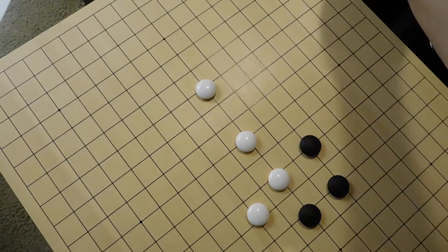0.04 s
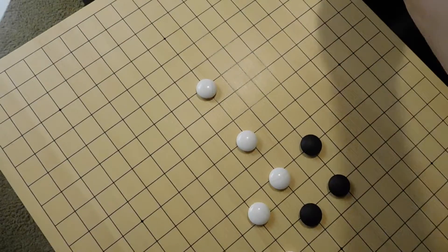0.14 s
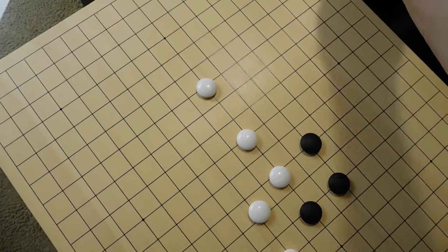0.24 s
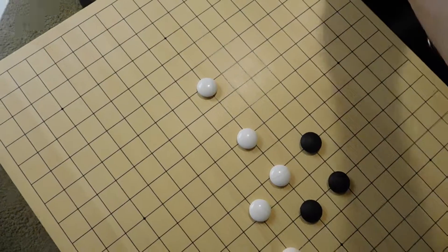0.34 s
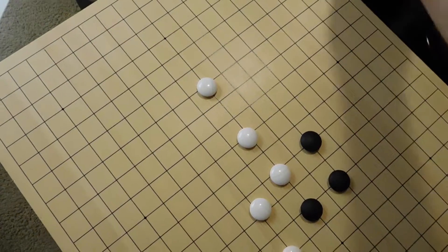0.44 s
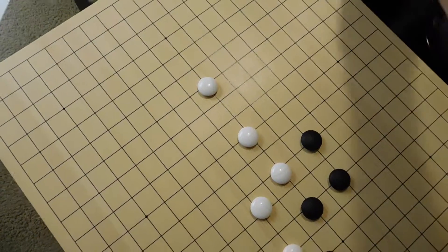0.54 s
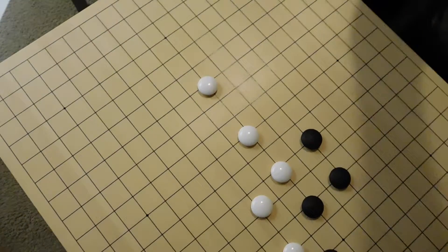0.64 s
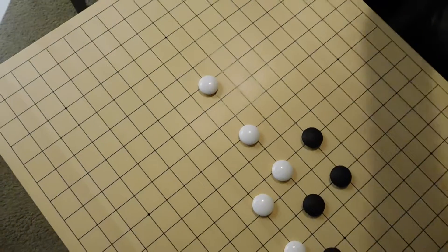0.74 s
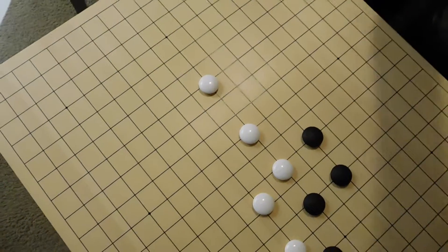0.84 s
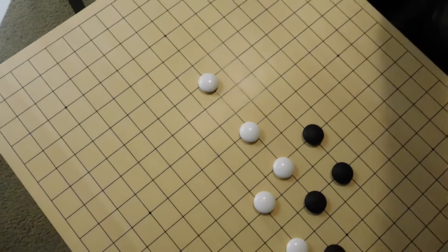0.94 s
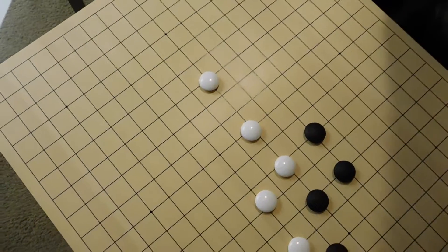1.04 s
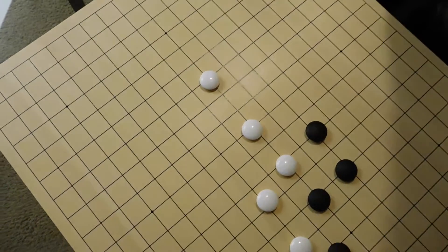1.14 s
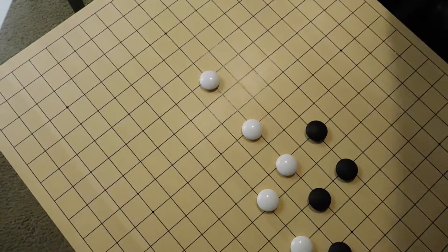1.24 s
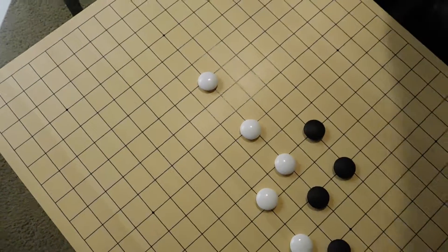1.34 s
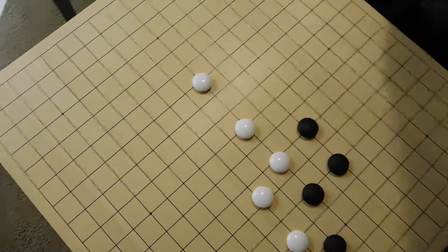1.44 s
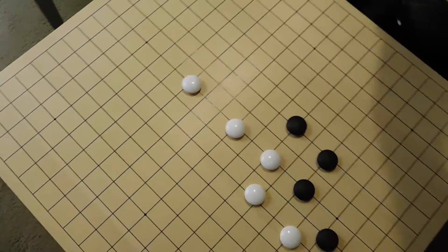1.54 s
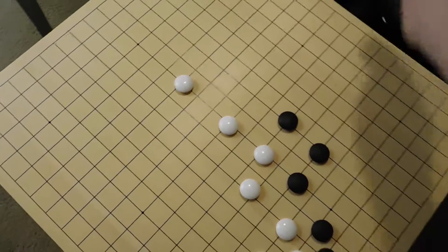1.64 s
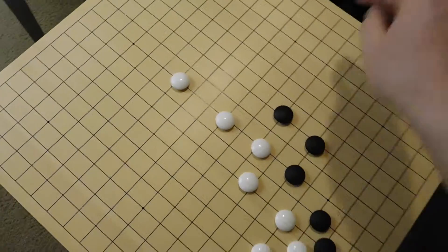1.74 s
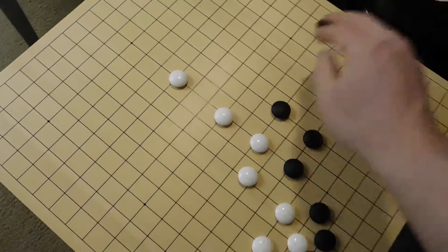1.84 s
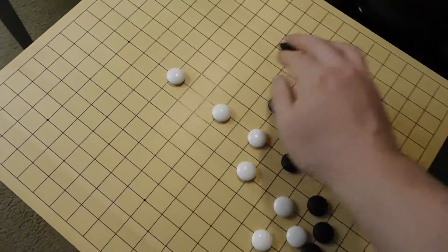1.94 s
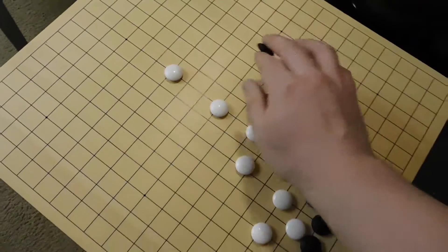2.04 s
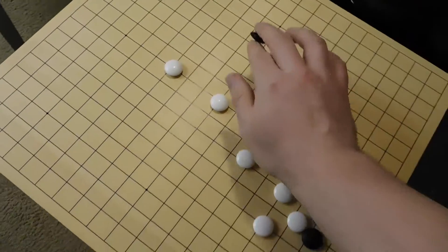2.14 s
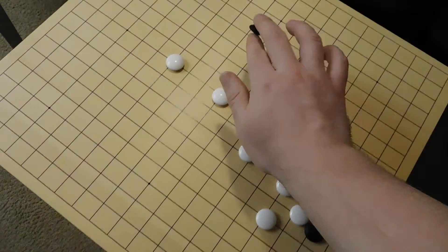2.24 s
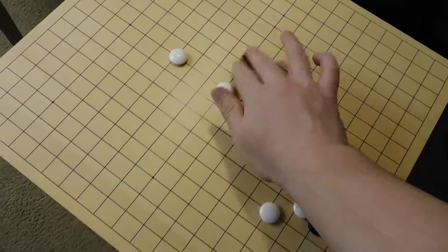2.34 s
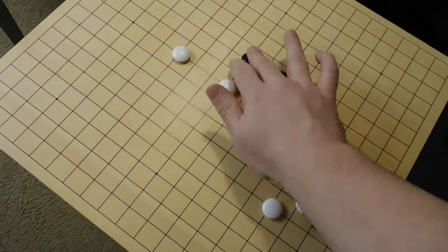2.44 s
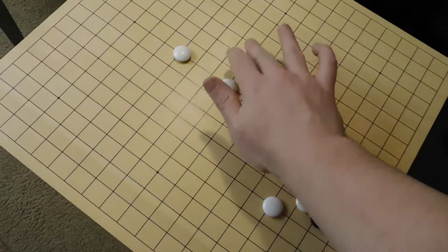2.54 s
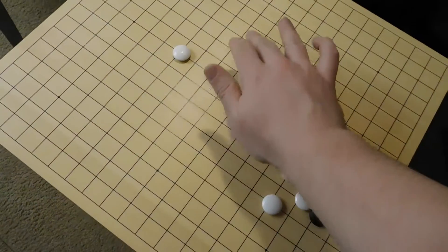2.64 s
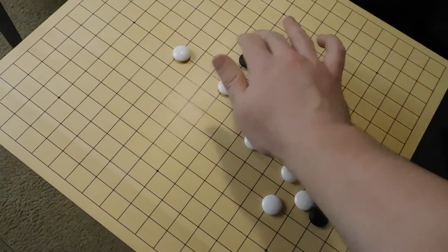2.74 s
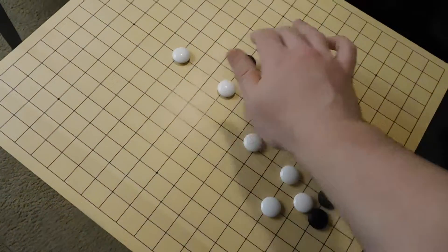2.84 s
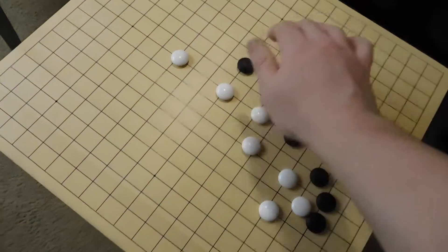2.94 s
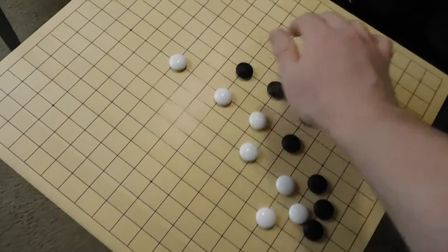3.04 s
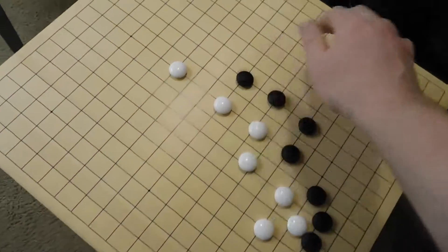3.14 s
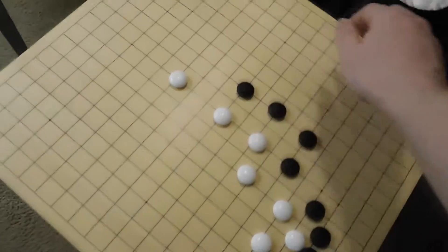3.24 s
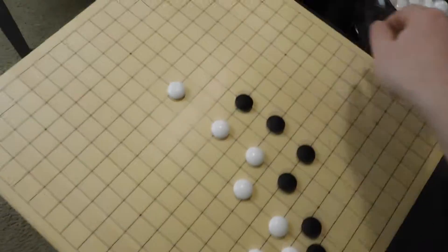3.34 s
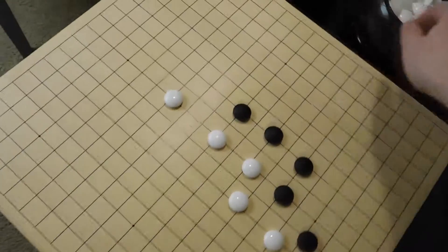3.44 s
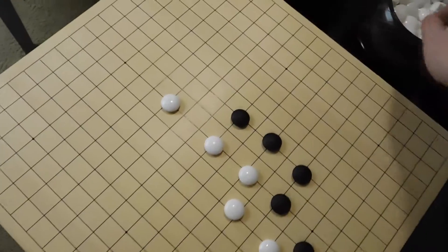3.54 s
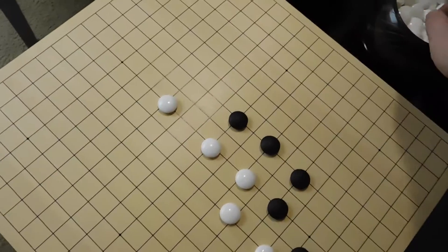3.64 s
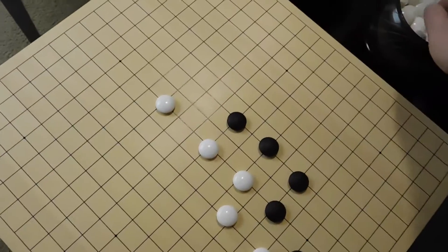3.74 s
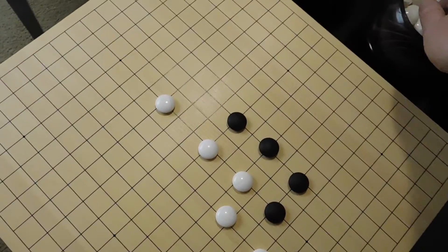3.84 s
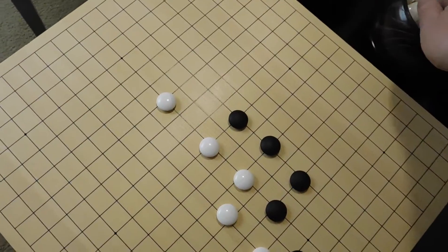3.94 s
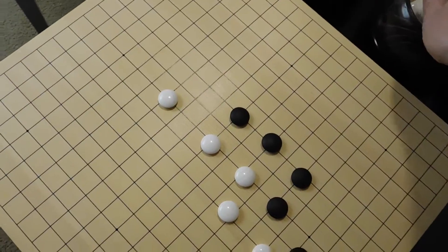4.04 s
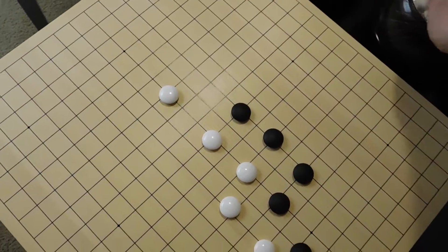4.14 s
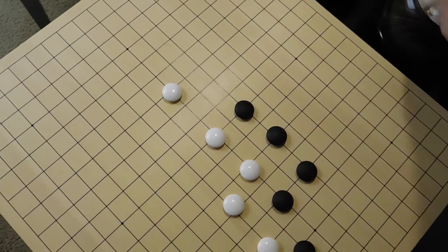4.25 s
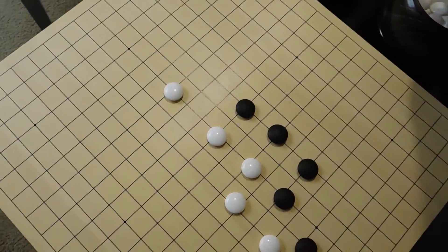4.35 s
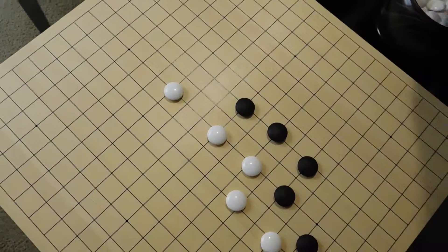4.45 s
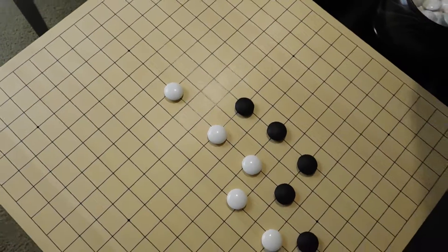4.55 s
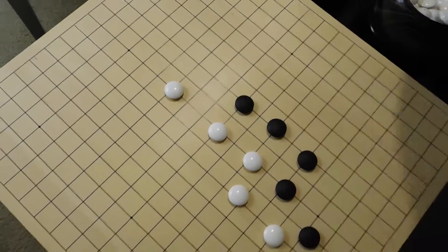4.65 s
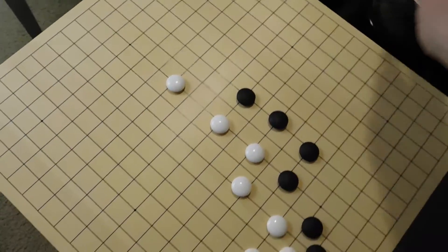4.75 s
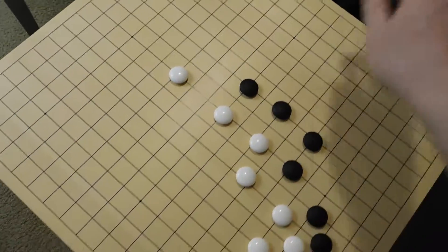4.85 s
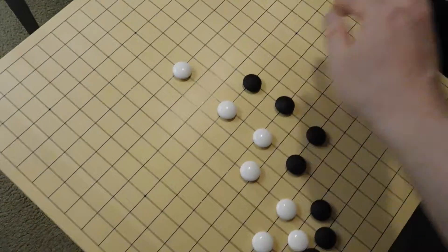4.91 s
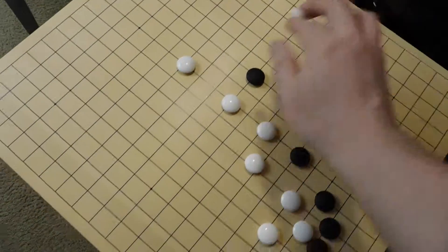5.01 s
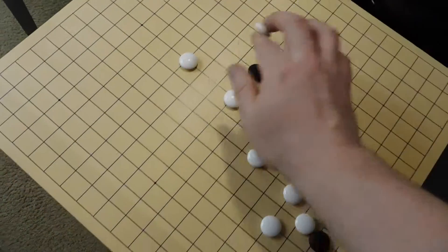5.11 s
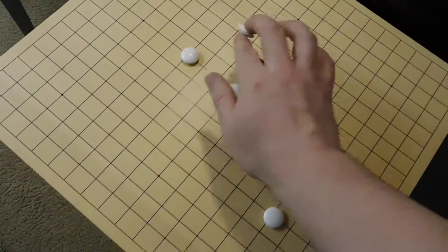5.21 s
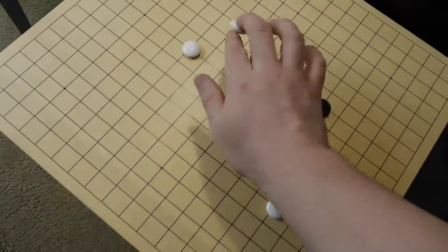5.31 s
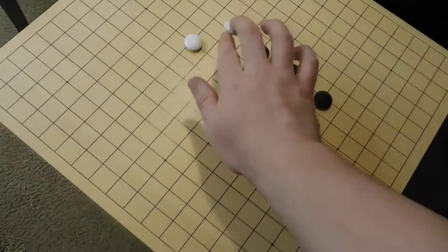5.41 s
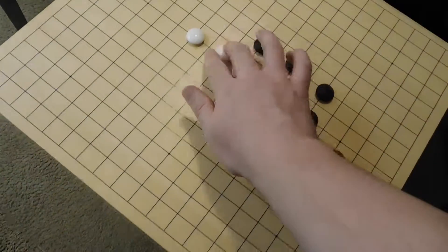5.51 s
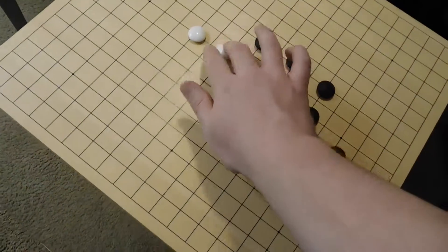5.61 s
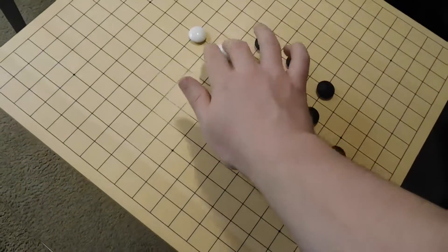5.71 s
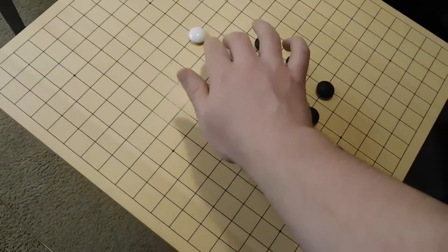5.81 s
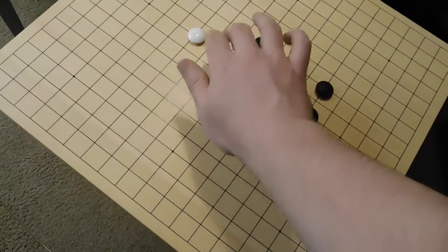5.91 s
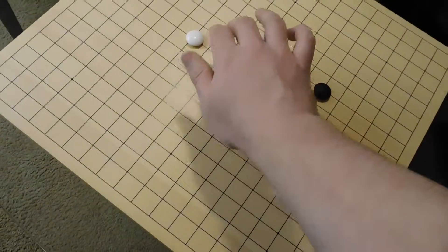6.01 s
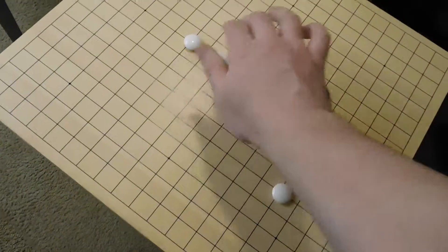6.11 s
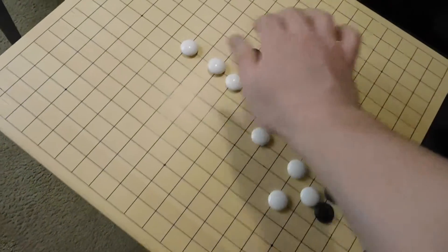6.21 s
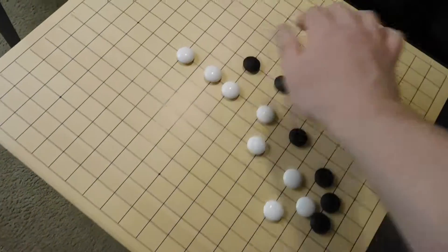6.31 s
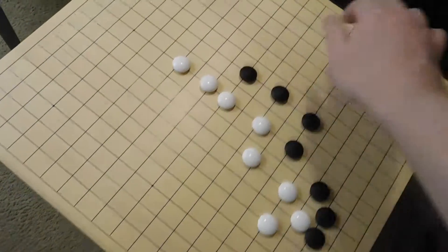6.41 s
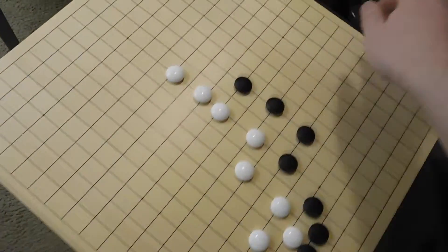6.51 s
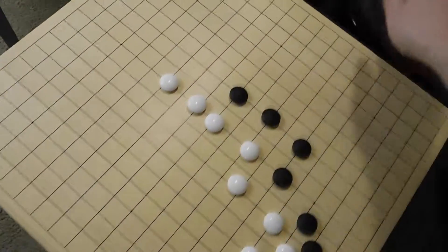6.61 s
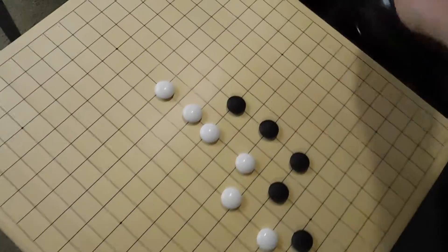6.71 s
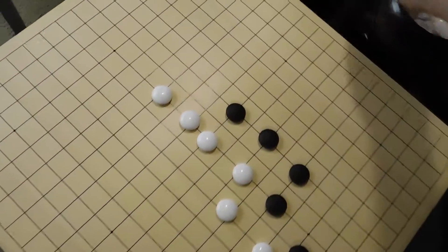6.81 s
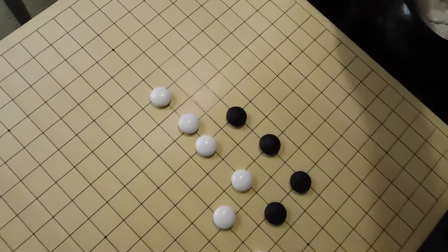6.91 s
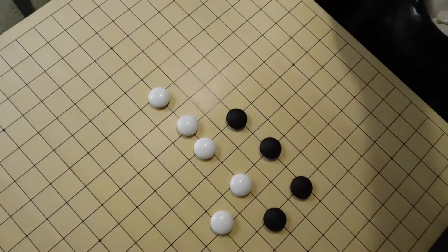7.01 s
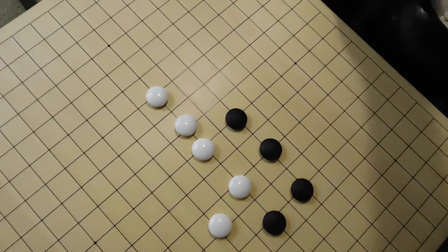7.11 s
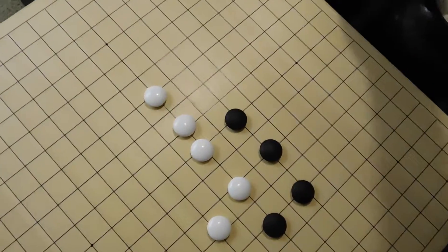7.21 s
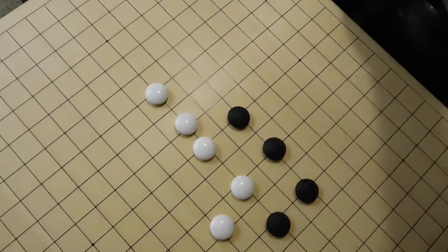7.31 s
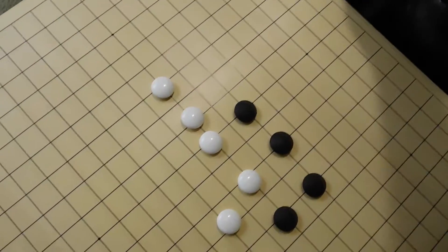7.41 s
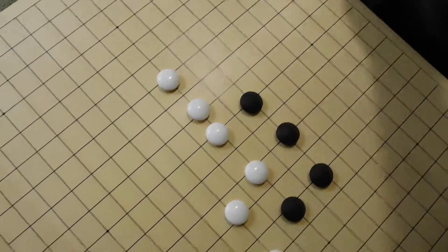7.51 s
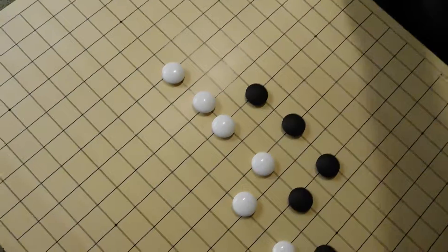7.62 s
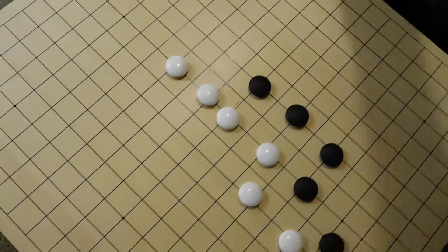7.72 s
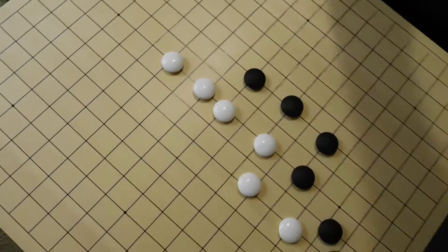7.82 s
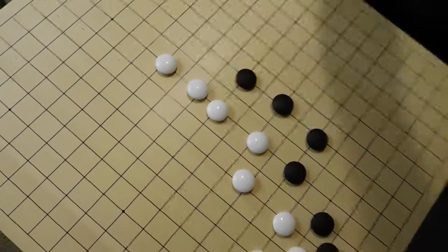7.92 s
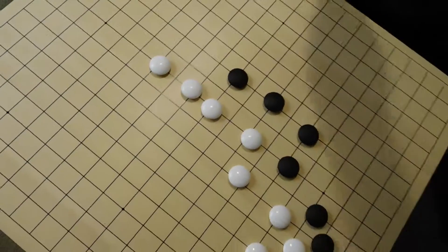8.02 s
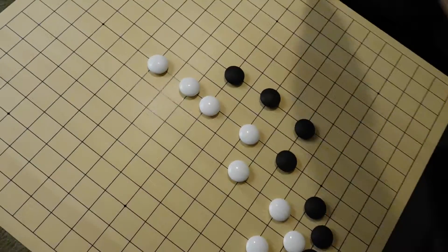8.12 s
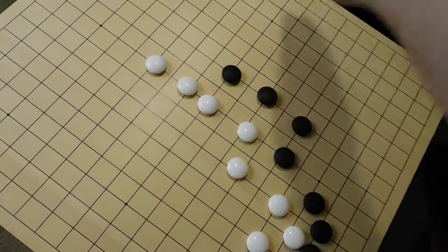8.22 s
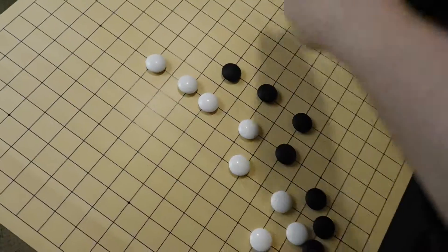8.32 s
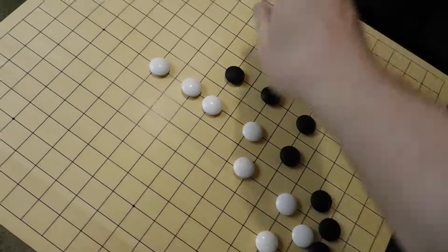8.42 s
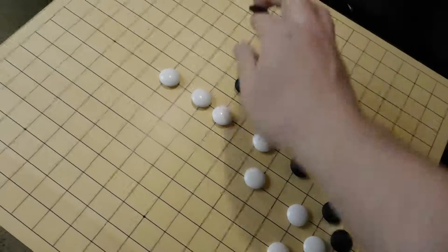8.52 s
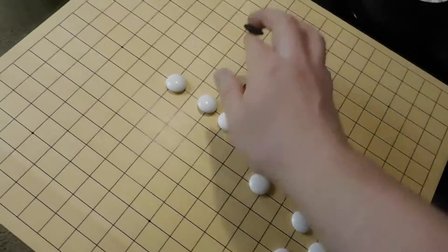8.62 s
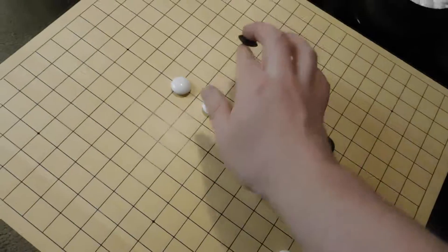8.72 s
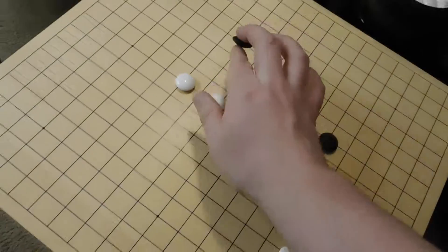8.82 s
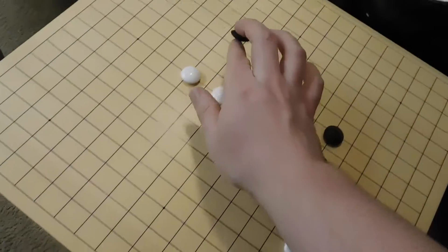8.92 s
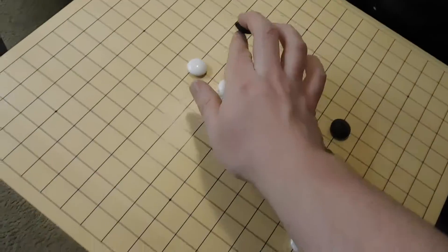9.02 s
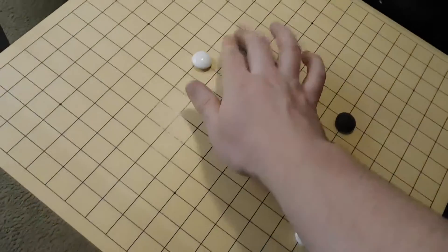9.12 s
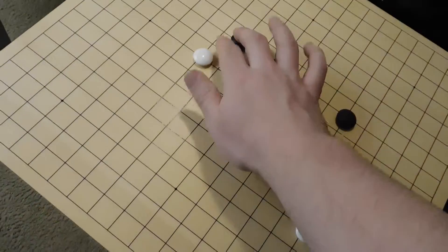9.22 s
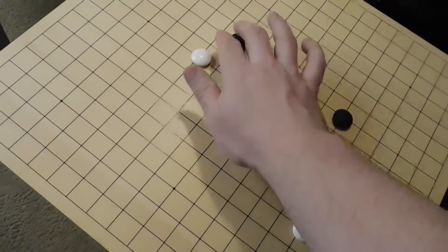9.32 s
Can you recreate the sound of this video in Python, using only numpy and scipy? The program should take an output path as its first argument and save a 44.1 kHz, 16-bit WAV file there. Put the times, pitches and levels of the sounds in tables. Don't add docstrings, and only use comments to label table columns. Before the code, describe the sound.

Three sharp, overloaded stone-on-wood cracks, seconds apart, with faint stone rattling and rubbing in a bowl between them, over low room hum.

```python
import sys
import numpy as np
from scipy import signal
from scipy.fft import rfft, irfft
from scipy.io import wavfile

SR = 44100
rng = np.random.default_rng(int(sys.argv[2]) if len(sys.argv) > 2 else 0)


def transcribe(u):
    v = np.clip(np.atleast_2d(u).T, -1, 1)
    q = np.round(v * 32767).astype(np.int16)
    wavfile.write(sys.argv[1], SR, q)


def field_ratio(decibels):
    return 10 ** (np.asarray(decibels, dtype=float) / 20)


N = 412776

# (time [s], blow [dB], sharpness [Hz], crack [dB], table shake [dB])
BLOWS = [
    (2.3950, 4, 14000, 3.5, -11.5),
    (5.5361, 2.5, 4010, 1.5, -10.5),
    (5.543, 8.5, 6110, 7, -36),
    (9.1729, 8, 6760, 7, -11.5),
    (9.1762, 10, 5955, 3.5, -40),
]
# (frequency [Hz], level [dB], t60 [s], low modes only: extra in the last handful [dB])
STONE = [
    [(2032, 2, 0.0039, -3), (2605, 7.5, 0.00547, -6), (3550, -1, 0.0068, 2), (3950, 5.5, 0.0025, 1.5)],
    [(5200, -5, 0.008), (6380, 2.5, 0.0047), (7400, 10.5, 0.0024), (8560, 6.5, 0.0021)],
    [(9400, 1.5, 0.0019), (10660, 12, 0.0013), (12150, -0.5, 0.0066), (12000, 3.5, 0.0031),
     (13900, -10, 0.0034), (15000, -3.5, 0.0021)],
]


def rms_one(x):
    return x / np.sqrt(np.mean(x ** 2) + 1e-20)


def at_hz(points, hz):
    table_hz, values = np.array(points).T
    return np.interp(np.log(hz), np.log(table_hz), values)


def level(rows, attack_s, fade_db_per_s):
    t = np.arange(0, N / SR + .01, .001)
    gain = 0
    for s, held_s, db in rows:
        rise = np.clip((t - s) / attack_s + 1, 0, 1) ** 2
        gain = gain + rise * field_ratio(db - fade_db_per_s * np.maximum(t - s - held_s, 0))
    return np.interp(np.arange(N) / SR, t, gain)


def colour(x, spectrum):
    log_gain = np.log(field_ratio(at_hz(spectrum, np.fft.rfftfreq(8192, 1 / SR) + 1)))
    cepstrum = irfft(log_gain)
    cepstrum[1:4096] *= 2
    cepstrum[4097:] = 0
    response = irfft(np.exp(rfft(cepstrum)))
    return signal.fftconvolve(x, response)[:len(x)]


def passed(x, order, edges_hz, kind):
    return signal.sosfilt(signal.butter(order, edges_hz, kind, fs=SR, output="sos"), x)


def train(times_s, sizes):
    out = np.zeros(N)
    np.add.at(out, (np.asarray(times_s) * SR).astype(int), sizes)
    return out


def ring(impulses, hz, t60):
    r = field_ratio(-60 / (t60 * SR))
    w = 2 * np.pi * hz / SR
    return signal.lfilter([0, np.sin(w)], [1, -2 * r * np.cos(w), r * r], impulses + 1e-18)


def grains(per_s, spread_db):
    sizes = field_ratio(spread_db * np.minimum(rng.exponential(1, N), 5)) * rng.choice([-1, 1], N)
    return sizes * (rng.random(N) < per_s / SR)


def board(modes, t, ring_share):
    out = 0
    for k, (hz, db, t60) in enumerate(modes):
        out = out + (-1) ** k * np.sin(2 * np.pi * hz * t) * field_ratio(db - 60 * t / (ring_share * t60))
    return out


def blows():
    spot_of_blow = [0, 1, 1, 2, 2]
    # (frequency [Hz], density [dB per Hz])
    cracks = [
        [(120, -39.5), (200, -12.5), (601, -18.5), (968, 1), (1940, -7.5), (2130, -5), (3600, -5.5),
         (4950, -23), (6400, -26.5), (16000, -34)],
        [(200, -32.5), (660, -35), (763, -4.5), (1100, -14.5), (1800, -16), (2250, -6.5), (2560, -14),
         (3560, -5), (4050, -18), (5200, -15), (16000, -42)],
        [(120, -44), (200, -24), (400, -37.5), (700, -28), (1230, -11.5), (1710, -21), (2170, -6), (4270, -15),
         (5420, -16), (16000, -44.5)],
    ]
    # (frequency [Hz], level [dB], t60 [s])
    first_spot = [(362, -18.5, 0.11), (281.6, -21.5, .1), (778, -10, 0.15), (910, -19.5, 0.1),
                  (1003, -9.5, 0.16), (1070, -14.5, 0.2), (1210, -12, 0.21), (1275, -15, 0.34),
                  (1395, -20.5, 0.27), (1475, -18.5, .1), (1330, -17.5, .12), (1667, -11.5, 0.15),
                  (1921, -11, 0.24), (2027, -12.5, .08), (1960, -10, .24), (2360, -10, 0.179),
                  (2450, -18.5, 0.18), (2618, -11.5, 0.16), (2780, -23, .15), (2667, -13, 0.16),
                  (2950, -27, 0.39), (3280, -15.5, 0.28), (3350, -12.5, 0.09), (3460, -14, 0.18),
                  (3600, -19.5, 0.13), (3989, -17, 0.18), (4500, -16.5, 0.06), (6260, -29, 0.16)]
    # (frequency [Hz], level [dB], t60 [s])
    second_spot = [(345, -33, .05), (738, -11, 0.12), (769, -4.5, .12), (880, -13, 0.081),
                   (1060, -16.5, 0.089), (1185, -8.5, .1), (1432, -13.5, 0.23), (1327, -22.5, .35),
                   (1481, -15, 0.11), (1596, -10.5, 0.14), (1941, -12, 0.23), (2077, -13.5, .2),
                   (2219, -5.5, .18), (2355, -4.5, .16), (2780, -21.5, 0.4), (2890, -26.5, 0.2),
                   (3090, -20.5, .1), (3226, -14.5, 0.16), (3280, -13, 0.22), (3448, -3.5, 0.15),
                   (3750, -9.5, 0.1), (4200, -16.5, .1), (4620, -15.5, 0.14), (5300, -21.5, 0.19)]
    # (frequency [Hz], level [dB], t60 [s])
    third_spot = [(343, -43.5, 0.04), (852, -12, 0.11), (994, -17, 0.19), (1208, -12.5, .16),
                  (1246, -15.5, 0.28), (1160, -18, 0.17), (1390, -18, 0.12), (1566, -13.5, 0.17),
                  (1951, -3.5, 0.24), (1994, -12, .15), (2100, -7.5, 0.18), (2145, -9.5, 0.17),
                  (2216, -9, 0.18), (2512, -14, 0.13), (2777, -10, .14), (2806, -12, 0.21),
                  (3072, -24, 0.16), (3370, -14.5, .16), (3490, -14, 0.12), (3760, -12, 0.12),
                  (3920, -21, 0.18), (4350, -17, 0.1), (4920, -25, 0.26), (5355, -15.5, .15),
                  (6333, -26.5, 0.076)]
    out = np.zeros((2, N))
    t = np.arange(SR // 2) / SR
    for (s, db, sharp_hz, crack_db, _), spot in zip(BLOWS, spot_of_blow):
        burst = rng.standard_normal(len(t)) * (field_ratio(-60 * t / 0.0033) + field_ratio(-60 * t / .06 - 11.5))
        crack = colour(burst, cracks[spot])
        sent_crack = np.linalg.norm(burst) * colour(t == 0, cracks[spot])
        pair = np.array([crack, sent_crack]) / np.abs(crack).max()
        pair = passed(pair, 1, min(sharp_hz, 20000), "low")
        modes = (first_spot, second_spot, third_spot)[spot]
        direct = field_ratio(db - 7.0) * board(modes, t, 0.72) + field_ratio(db + crack_db - 1.5) * pair[0]
        sent = field_ratio(db - 4.0) * board(modes, t, 0.2) + field_ratio(db + crack_db + 0.5) * pair[1]
        i = int(s * SR)
        out[:, i:i + len(t)] += np.array([direct, sent])[:, :N - i]
    return out


def table():
    # (frequency [Hz], level [dB], t60 [s])
    rocking = [(21.27, 5.0, 0.95), (24.68, 3.5, 1.25)]
    # (frequency [Hz], level [dB], t60 [s])
    thuds = [(84, -32, .6), (41, -29, .3)]
    # (time [s], held [s], rumble [dB])
    lean = [(0.0, 0.035, -38.5), (.23, 0.019, -38), (.45, 0.037, -41), (1.16, 0.047, -36)]
    lag_s = .0045
    s, blow_db, *_, shake_db = np.transpose(BLOWS)
    push = train(s + lag_s, field_ratio(shake_db))
    sway = sum((-1) ** k * field_ratio(db) * ring(push, hz, t60) for k, (hz, db, t60) in enumerate(rocking))
    thud = sum(ring(train(s, field_ratio(blow_db + db)), hz, t60) for hz, db, t60 in thuds)
    rumble = passed(rng.standard_normal(N), 2, [70, 230], "band")
    return sway + thud + level(lean, attack_s=0.041, fade_db_per_s=127) * rms_one(rumble)


def touches():
    # (time [s], stones [dB], brightness, top over low [dB], bowl knock [dB])
    first_handful = [(.0035, -39, 10, -31), (0.091, -50, -6, -46), (0.1437, -39, 14, -48),
                     (0.1495, -35, 11, -31), (.1545, -28.5, 1, -27), (.164, -37, -11, -41),
                     (0.172, -44, 25, -42), (.1868, -42, -17, -42.5), (0.1964, -42, 8, -39),
                     (0.2048, -28.5, -5, -43), (0.2235, -30.5, -2, -34), (0.3826, -34.5, 8, -26.5),
                     (0.391, -44, 14, -48), (0.397, -46, 11, -39), (0.4145, -42, 8, -44),
                     (.4212, -47, 12, -53), (0.449, -22, 21, -24.5), (0.4568, -33, 19, -33.5),
                     (0.4635, -41, 22, -45), (0.4735, -48, 17, -50), (0.484, -40, 10, -34.5),
                     (0.5003, -37, 32, -35.5), (0.5155, -40.5, 3, -48), (0.521, -40, -4, -31),
                     (1.1506, -14.5, 11, -13.5), (1.1586, -13.5, 11, -21), (1.1655, -21, 17, -16),
                     (1.1818, -29, 20, -34.5), (1.1905, -25, 16, -40), (1.173, -31.5, 22, -27),
                     (1.2016, -31, 14, -27), (1.2078, -23.5, 10, -28)]
    # (time [s], stones [dB], brightness [dB], bowl knock [dB])
    second_handful = [(3.4461, -47.5, -8, -56), (3.461, -58, -3, -58), (3.4823, -47.5, -12, -53),
                      (3.491, -56, -8, -60), (3.5007, -45, 0, -58), (3.527, -54, -14, -60),
                      (3.5355, -49, -5, -60), (3.5446, -42, -9, -60), (3.5507, -44, -6, -60),
                      (3.559, -50, -5, -58), (3.569, -55, -1, -56), (3.8715, -41, -3, -46),
                      (3.8744, -31, -11.5, -44), (3.882, -48, 9, -54), (3.8905, -46, 8, -50),
                      (3.903, -46, 2, -47), (3.9096, -26.5, 4, -25.5), (3.918, -41, 10, -59),
                      (3.9262, -38, -9, -45), (3.944, -44, 0, -48), (3.95, -37, -2, -53),
                      (3.956, -35, -2, -54), (3.962, -42, -5, -50), (3.974, -55, -4, -50),
                      (3.9971, -29, 0.5, -32), (4.008, -40, -3, -46), (4.0185, -51, 4, -51),
                      (4.0563, -45, -4, -49), (4.08, -37, -4, -50), (4.091, -35.5, 9, -51),
                      (4.1, -51, 10, -58), (4.11, -34, -3, -35), (4.1184, -34.5, -2, -36),
                      (4.1312, -44, 4, -48), (4.1585, -40.5, -7, -39), (4.187, -22.5, 15, -22),
                      (4.1957, -30, 11, -35), (4.202, -36, 10, -45), (4.221, -36, 5, -47),
                      (4.23, -32, 5, -49), (4.2357, -37, -3, -45), (4.2507, -29, 5, -27),
                      (4.2565, -50, 10, -48), (4.266, -47, 8, -50), (4.272, -35, 12, -29),
                      (4.2867, -43, 3, -53), (4.476, -34.5, 1, -39)]
    # (time [s], stones [dB], brightness [dB], bowl knock [dB])
    third_handful = [(7.177, -35, 7, -50), (7.1802, -23.5, 8, -37), (7.194, -47, 16, -43),
                     (7.255, -47, -2, -41), (7.26, -32, 2, -39), (7.3785, -33.5, 1, -41),
                     (7.4528, -48, -20, -44), (7.4632, -29.5, -12, -34), (7.4768, -33, -2, -37),
                     (7.5186, -50, -20, -53), (7.53, -29, 0, -52), (7.538, -30.5, 6, -36),
                     (7.564, -31, 4, -43), (7.6, -24, -12, -36), (7.604, -46, 0, -15),
                     (7.614, -33, -9, -31), (7.655, -47, 4, -48), (7.677, -36.5, -7, -48),
                     (7.71, -42, -12, -52), (7.73, -36.5, -17, -51), (7.7422, -27, -12, -33),
                     (7.749, -30.5, 4, -51), (7.7636, -37, 8, -36), (7.7873, -22.5, -22, -25),
                     (7.797, -37, -11, -45), (7.805, -37, 10, -52), (7.8122, -40, 2, -39)]
    bowl_gain_db, middle_db = 2, -2
    nudge_s, nudge_loss_db, nudge_uneven_db = .019, 24, 4
    s, db, bright_db, knock_db = np.transpose(first_handful + second_handful + third_handful)
    zones_db = np.array([knock_db + bowl_gain_db, db - bright_db / 2, db + middle_db, db + bright_db / 2])
    chance = rng.normal(0, 1, (len(s), 5))
    nudge_db = zones_db - nudge_loss_db + nudge_uneven_db * chance[:, :4].T
    all_s = np.append(s, s + nudge_s * field_ratio(2.2 * chance[:, 4]))
    return all_s, *np.hstack([zones_db, nudge_db])


def clicks():
    # (frequency [Hz], level [dB], t60 [s], extra in the last handful, rim knocked [dB])
    bowl = [(434, -50, 0.058, 2), (840, 2.5, 0.022, 0.5), (1122, -6.5, 0.0088, 1),
            (1452, -2.5, 0.0078, 8.5)]
    # (low edge [Hz], high edge [Hz])
    zones_hz = [(600, 1700), (1700, 4500), (4500, 9000), (9000, 15500)]
    # (frequency [Hz], level [dB], t60 [s])
    loose = [(2680, -3, 0.042), (3590, 4, 0.031), (4720, -0.5, 0.019), (5470, -5, 0.019),
             (7360, -11, 0.018), (8740, -10, 0.021)]
    contact_s, echo_db, last_handful_s = .0006, -6, 7
    s, *zones_db = touches()
    chance = rng.normal(0, 1, (len(s), 20))
    spread = rng.random((len(s), 20))
    echo_s = 0.0007 * (.6 + .8 * spread[:, 0])
    direct, sent, k = 0, 0, 1
    sends_db, signs = (26.9, 21.7, 22.0, 19.3), (1, -1, 1, -1)
    for modes, db, band_hz, send_db, sign in zip([bowl, *STONE], zones_db, zones_hz, sends_db, signs):
        uneven = 1 if modes is bowl else 2.2
        for hz, mode_db, t60, *last_db in modes:
            uneven_db = uneven * chance[:, k] + sum(last_db) * (s > last_handful_s)
            size = field_ratio(db + mode_db - 4.0 + uneven_db) * (-1) ** k
            start = s + contact_s * spread[:, k]
            hits = train(start, size) + train(start + echo_s, field_ratio(echo_db) * size)
            direct = direct + ring(hits, hz, t60)
            k += 1
        sent = sent + sign * passed(train(s, field_ratio(db + send_db)) + 1e-18, 2, band_hz, "band")
    free = train(s, field_ratio(zones_db[1] + 3.5) * (s > 3.4) * (s < 3.6))
    free_ring = 0
    for hz, db, t60 in loose:
        favour = np.sin(np.arange(N) * hz)
        free_ring = free_ring + field_ratio(db) * ring(free * favour, hz, t60)
    return np.array([direct + free_ring, sent + .3 * free_ring])


def rim():
    # (time [s], level [dB])
    rim_knocks = [(7.5994, -9.5), (7.7874, -22), (3.8755, -28)]
    # (frequency [Hz], level [dB], t60 [s])
    rim_modes = [(567, -17, 0.049), (807, -17, 0.14), (1310, 1.5, 0.012), (2840, -1, 0.0076),
                 (3840, -6, 0.018), (6070, -8.5, 0.013)]
    s, db = np.transpose(rim_knocks)
    knocks = train(s, field_ratio(db))
    rows = []
    for ring_share, gain_db in ((1, 0), (.2, 7)):
        rows.append(sum((-1) ** k * field_ratio(mode_db + gain_db) * ring(knocks, hz, ring_share * t60)
                        for k, (hz, mode_db, t60) in enumerate(rim_modes)))
    return np.array(rows)


def stir():
    # (time [s], held [s], level [dB])
    pushes = [(0.0, 0.004, -30.5), (.05, 0.1, -40), (.146, 0.1, -35), (.335, 0.023, -44.5),
              (.382, 0.017, -42), (.447, 0.009, -33), (3.52, 0.037, -45), (3.82, .03, -54),
              (3.872, 0.12, -49), (4.085, 0.032, -43), (4.186, 0.033, -43.5), (7.18, 0.0063, -37.5),
              (7.22, 0.11, -46), (7.37, 0.07, -42.5), (7.5, 0.13, -40.5), (7.598, 0.0056, -33),
              (7.7, 0.067, -38), (7.79, .012, -50)]
    # (frequency [Hz], density [dB per Hz])
    rub_colour = [(290, -31.5), (500, 1.5), (640, 0.5), (1030, 0), (2040, -2), (3650, -12.5), (5020, -14),
                  (10400, -12.5), (11300, -15), (16000, -31.5)]
    rub = grains(4500, spread_db=2.5)
    rings = 0
    for modes in STONE[:2]:
        for hz, db, t60, *_ in modes:
            some = rub * (rng.random(N) < .3)
            rings = rings + field_ratio(db) * ring(some, hz, 0.51 * t60)
    mix = rms_one(colour(rub, rub_colour)) + 0.49 * rms_one(rings)
    return level(pushes, attack_s=0.0076, fade_db_per_s=286) * field_ratio(-9.5) * mix


def slide():
    # (time [s], held [s], level [dB])
    pushes = [
        (2.75, 0.0094, -52.5),
        (2.856, 0.0057, -44.5),
        (2.89, 0.27, -58.5),
        (3.228, 0.0094, -59.5),
    ]
    rub = grains(1500, spread_db=3)
    wood = ring(rub, 1170, 0.023) + 0.36 * ring(rub, 1900, 0.0084)
    return level(pushes, attack_s=0.0059, fade_db_per_s=500.5) * rms_one(wood)


def brush():
    # (time [s], held [s], level [dB], strongest frequency [Hz])
    strokes = [(.658, 0.0082, -53, 7960), (.722, 0.0066, -54, 12370), (.74, 0.1, -61.5, 4340),
               (.772, 0.018, -72.5, 12500), (.883, 0.037, -54, 6200), (.993, 0.033, -59, 10500),
               (1.05, 0.02, -67, 10680), (1.163, 0.037, -29.5, 11000), (3.69, .05, -67.5, 12400),
               (8.19, 0.025, -63.5, 14000), (9.0, .03, -73, 12970), (7.72, 0.036, -41, 5700),
               (7.795, 0.018, -45, 5700)]
    ring_cycles, broad_gain = 14.0, .9
    rub = grains(4015, spread_db=-1.0)
    broad = rms_one(passed(rub, 2, 4503, "high"))
    out = 0
    for *row, hz in strokes:
        gain = level([row], attack_s=.006, fade_db_per_s=502.5)
        out = out + gain * (rms_one(ring(rub, hz, ring_cycles / hz)) + broad_gain * broad)
    return field_ratio(-1.0) * out


def room(x):
    # (frequency [Hz], t60 [s])
    room_t60 = [(150, 0.78), (750, 0.16), (1300, 0.26), (2500, 0.2), (5000, 0.26), (9000, 0.25),
                (12500, .21), (16000, 0.11)]
    gap_s, room_db = 0.0015, -7
    late_db, late_stretch, late_top_hz = -13.5, 2.58, 6000
    edges_hz = np.geomspace(14, 17000, 31)[8:]
    t = np.arange(int(.7 * SR)) / SR
    white = rng.standard_normal((2, len(t)))
    echo = 0
    for k, (low, high) in enumerate(zip(edges_hz, edges_hz[1:])):
        band = passed(white[k % 2], 2, [low, high], "band")
        t60 = at_hz(room_t60, np.sqrt(low * high))
        late = field_ratio(late_db - 60 * t / (late_stretch * t60)) / (1 + (low / late_top_hz) ** 2)
        echo = echo + band * (field_ratio(-60 * t / t60) + late)
    echo = echo * np.clip(t / gap_s - 1, 0, 1)
    return field_ratio(room_db) * signal.fftconvolve(x, echo / np.sqrt(np.sum(echo ** 2)))[:N]


def quiet():
    # (frequency [Hz], density [dB per Hz])
    air_colour = [(52, -54.5), (95, -32), (127, -7), (151, -9.5), (172, -10.5), (277, -12.5), (456, -10.5),
                  (497, -13), (891, -21), (1080, -21), (2210, -31.5), (2750, -30.5), (8000, -41.5),
                  (9800, -46), (15500, -48.5)]
    # (frequency [Hz], rms [dB], wander [Hz])
    hum = [(22.7, -37, 1.8), (27, -48, 3.8), (39.3, -52.5, 4), (51, -54, 3), (58.3, -38, .1),
           (118.5, -56.5, 1.5), (138.5, -48, 6.5), (223.7, -54.5, 11), (275, -49.5, 2.1), (317, -54.5, 2.7),
           (372, -56.5, 14), (513, -59, 2.8), (1915, -72, 29), (2740, -71, 79), (5760, -75.5, 70)]
    air = colour(rng.standard_normal(N + SR), air_colour)[SR:]
    audible = passed(air, 4, 300, "high")
    out = field_ratio(-49.5) * air / np.std(audible)
    t = np.arange(N) / SR
    for hz, db, wander_hz in hum:
        r = np.exp(-100 * np.pi * wander_hz / SR)
        slow = signal.lfilter([1], [1, -r], rng.standard_normal((2, N // 100 + 900)))[:, 898:]
        a, b = (np.interp(t * SR / 100, np.arange(len(v)), rms_one(v)) for v in slow)
        steady = 0.72 / wander_hz
        phase = 2 * np.pi * hz * t
        out += field_ratio(db) * rms_one((steady + a) * np.sin(phase) + b * np.cos(phase))
    return out


def whine():
    # (frequency [Hz], rms [dB], t60 [s])
    lines = [(5000, -79, .03), (5500, -78.5, .05), (7270, -79.5, .02), (8200, -84, .02), (8900, -90, .03),
             (12000, -87.5, .3)]
    white = rng.standard_normal(N)
    return sum(field_ratio(db) * rms_one(ring(white, hz, t60)) for hz, db, t60 in lines)


def scene():
    direct, sent = blows() + clicks() + rim() + stir() + slide()
    return (direct + room(sent) + table() + quiet() + whine() + brush())[None]


def roll_off(x):
    return signal.sosfilt(signal.butter(12, 16560, fs=SR, output="sos"), x)


def record(dry):
    dull = signal.sosfilt(signal.ellip(8, .5, 28, 15720, fs=SR, output="sos"), dry)
    return roll_off(np.clip(dull, -1, 1))


dry = scene()
out = record(dry)
transcribe(out)
```